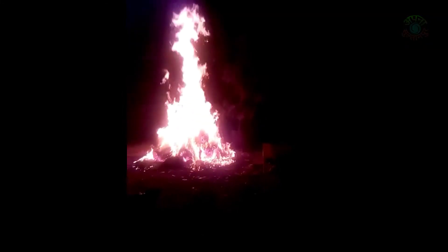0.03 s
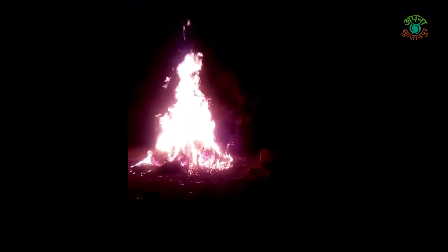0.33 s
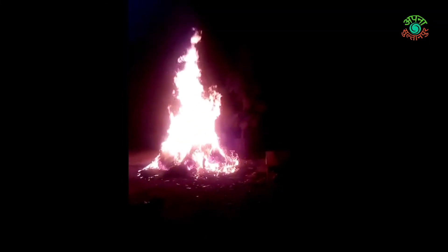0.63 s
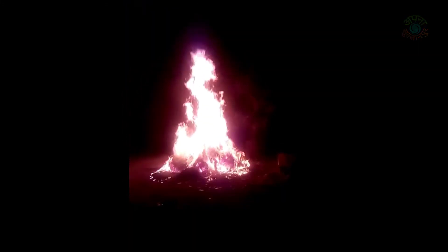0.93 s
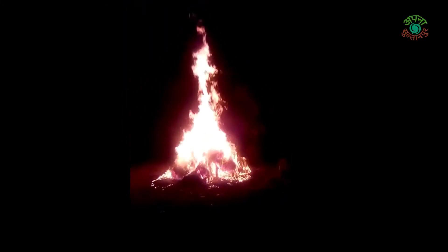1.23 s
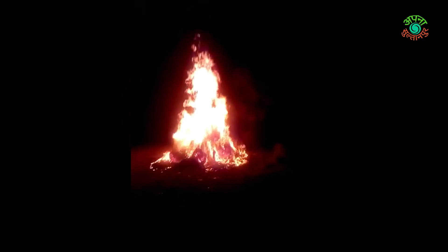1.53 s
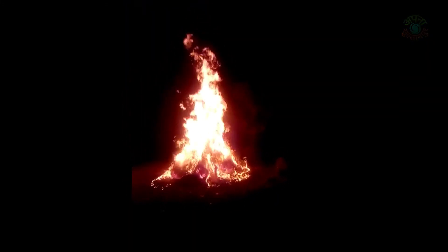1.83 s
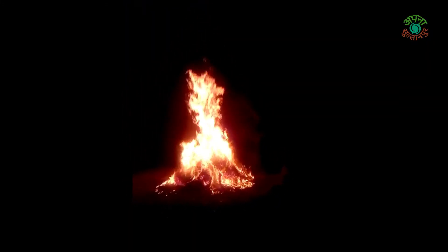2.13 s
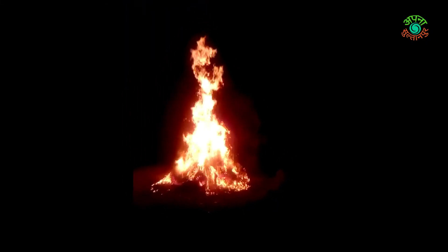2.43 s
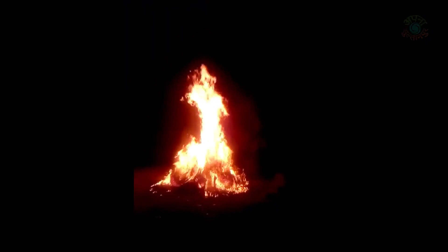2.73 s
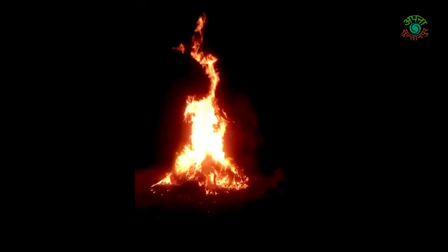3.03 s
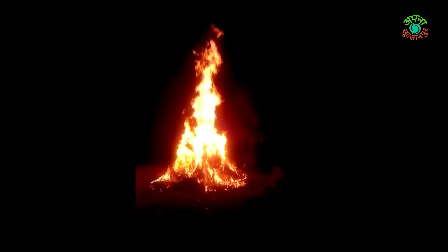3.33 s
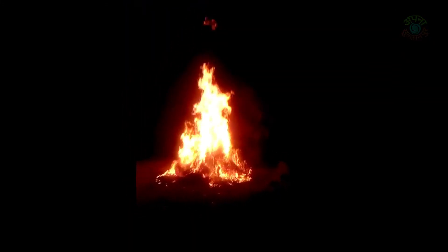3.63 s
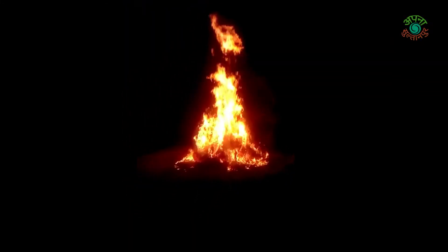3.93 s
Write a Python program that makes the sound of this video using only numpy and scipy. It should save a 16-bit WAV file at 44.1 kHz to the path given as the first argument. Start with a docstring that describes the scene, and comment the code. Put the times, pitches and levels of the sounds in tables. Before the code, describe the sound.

Low roar and rumble of a big outdoor fire, surging under a fine sizzle.

```python
"""A large bonfire burns outdoors at night, over a faint mains hum and a murmur of air. From the start,
dense puffs of burning gas radiate a low roar and a deep rumble, with the rush of eddies and a fine
sizzle above. Leaping flames whoomph twice in the first half second, where the rush is strongest.
The fire surges again near 1.4 s and 2.3 s; after that the whoomphs are weaker and the rumble sinks."""
import sys
import numpy as np
from scipy import signal
from scipy.fft import rfft, irfft
from scipy.io import wavfile
from scipy.ndimage import uniform_filter1d

SR = 44100
rng = np.random.default_rng(int(sys.argv[2]) if len(sys.argv) > 2 else 0)


def generate_wav(sig):
    """Save sig (samples, or channels by samples) to the path in sys.argv[1] as 16-bit PCM at SR."""
    pcm = np.round(np.clip(np.atleast_2d(sig).T, -1, 1) * 32767).astype(np.int16)
    wavfile.write(sys.argv[1], SR, pcm)


N = 176400

# spectral shape of each layer: frequency_hz, relative_db
AIR_SPECTRUM = [(10, -7.5), (30, -1.5), (60, -5.5), (200, -24), (2000, -69)]
SIZZLE_SPECTRUM = [(900, -16.5), (2200, 4), (2700, 2), (3400, 2.5), (4700, -0.6), (5200, -3), (5850, -5),
                   (6300, -15), (6900, -23.5), (7600, -37), (8100, -43.5), (9000, -42), (10000, -59.5)]
RUSH_SPECTRUM = [(60, -42.5), (180, -18), (340, -2.5), (380, 0), (420, 6), (470, -2), (535, -4),
                 (590, -1.5), (660, 2.5), (770, -1.5), (815, -4), (850, -5), (885, -3), (1210, -3),
                 (1310, -7), (1480, -5.5), (2000, -9), (2800, -25.5), (6000, -54.5), (9000, -81)]
RUMBLE_SPECTRUM = [(25, -34.5), (58, -26), (70, -19), (82, -7.5), (91, 6.5), (108, -2), (121, 0.5),
                   (140, -12), (300, -80.5), (900, -100)]
ROAR_SPECTRUM = [(80, -62), (112, -11.5), (134, -7), (155, 3), (170, -5), (184, 1.5), (198, -3), (216, 4.5),
                 (246, 0.5), (284, -6.5), (314, -1), (345, -19.5), (600, -61), (3000, -97)]
# narrow background resonances: pitch_hz, width_hz, level_db
HOLLOW_TONES = [(472.7, 6, -62.5), (934, 19, -79), (1014, 5.1, -80), (1219, 14, -75.5)]
# lines of the mains hum: harmonic_number, level_db
HUM_HARMONICS = [(3, -68), (6, -65), (7, -71.5), (9, -65.5), (10, -63.6), (14, -69.5), (15, -72.5),
                 (16, -77), (20, -81), (22, -72), (23, -76.5), (24, -77.5), (28, -82), (29, -80), (33, -82)]
# envelopes of the rush and the sizzle, before their trims: time_s, rush_db, sizzle_db
RUSH_SIZZLE_ENVELOPES = [(0.0, -58, -60.5), (0.06, -48, -56), (0.34, -48, -54.5), (0.54, -53.5, -58.5),
                         (0.68, -52, -58.5), (0.74, -55.5, -61.5), (0.98, -61.5, -65.5),
                         (1.07, -55.5, -62.5), (1.25, -59.5, -64.5), (1.45, -54.5, -61.5),
                         (1.8, -59, -64.5), (1.94, -59.5, -62), (2.2, -55, -61.5), (2.55, -56.5, -61.5),
                         (2.92, -57, -61.5), (3.16, -62.5, -65.5), (3.48, -58, -63), (4.0, -62, -64.5)]
# envelopes of the rumble and the roar, before their trims: time_s, level_db
RUMBLE_ENVELOPE = [(0.0, -63), (0.06, -56), (0.4, -52.5), (0.54, -60), (0.63, -56), (0.92, -63.5),
                   (1.07, -57), (1.2, -65), (1.36, -53.5), (1.58, -55), (1.64, -53.5), (2.05, -54.5),
                   (2.42, -57.5), (2.52, -65), (2.8, -61), (2.89, -74), (3.1, -67), (3.4, -82), (3.6, -73),
                   (3.8, -64.5), (3.93, -78)]
ROAR_ENVELOPE = [(0.0, -51.5), (0.04, -47), (0.42, -50), (0.5, -51), (0.72, -51), (0.82, -54), (0.98, -53),
                 (1.08, -48.5), (1.26, -53), (1.4, -48.5), (1.63, -50.5), (1.7, -52), (1.93, -52.5),
                 (2.15, -55), (2.42, -50.5), (2.67, -58), (2.8, -53.5), (3.02, -52.5), (3.12, -56),
                 (3.45, -55), (3.7, -54.5), (3.8, -59), (3.87, -56)]
# Gaussian swells of leaping flames: peak_s, sigma_s, pitch_hz, level_db
FLAME_LEAPS = [(0.116, 0.052, 220, -48.5), (0.11, 0.077, 87, -53.5), (0.342, .08, 227, -47.5),
               (0.329, .09, 90, -53.5), (0.74, .035, 225, -51.5), (1.43, .075, 219, -50.5),
               (1.44, 0.08, 94.3, -50.5), (1.576, 0.081, 187, -52), (2.208, 0.07, 223.5, -52),
               (2.25, 0.14, 152.6, -54), (2.353, 0.062, 239, -50.5), (2.843, 0.12, 198, -54.5),
               (3.42, 0.097, 221, -55)]

RUMBLE_TRIM_DB, ROAR_TRIM_DB, RUSH_TRIM_DB, SIZZLE_TRIM_DB = -6, -0.22, -0.38, -1.56
PUFFS_PER_S, EDDIES_PER_S, CRACKLES_PER_S = 1500, 12000, 20000
PULSE_SCATTER_DB, BAND_OCTAVES = 1, 0.55
WHOOMPH_Q = 9.6  # pitch over width
MAINS_HZ, LOW_HUM_TRIM_DB = 50, -8
AIR_DB, HISS_DB = -86.5, -100.5
CUTOFF_HZ, DC_OFFSET = 15800, .0013


def undb(db):
    """Amplitude grows tenfold for every 20 dB."""
    return 10 ** (np.asarray(db) / 20)


def unit(x):
    """Normalisation to a standard deviation of 1."""
    return x / np.std(x)


def envelopes(table):
    """Linear interpolation in time gives one curve per level column."""
    times, *columns = np.array(table).T
    return [np.interp(np.arange(N) / SR, times, column) for column in columns]


def colour(x, spectrum):
    """Minimum-phase filtering: folding the cepstrum gives a causal filter of the given spectrum."""
    hz, db = np.array(spectrum, float).T
    bin_hz = np.maximum(np.arange(N // 2 + 1) * SR / N, 1)
    gain = undb(np.interp(np.log(bin_hz), np.log(hz), db))
    cepstrum = irfft(np.log(gain), N)
    cepstrum[1:N // 2] *= 2
    cepstrum[N // 2 + 1:] = 0
    return irfft(rfft(x) * np.exp(rfft(cepstrum)), N)


def shot_noise(per_s, scatter_db):
    """One-sided pressure pulses arrive independently at random; their mean is removed."""
    pulses = (rng.random(N) < per_s / SR) * undb(scatter_db * rng.standard_normal(N))
    return unit(pulses.mean() - pulses)


def steady(x, span_s, share):
    """Compression by the running power takes a share of the chance swells out of a noise."""
    window = int(span_s * SR) + 1
    power = uniform_filter1d(uniform_filter1d(x ** 2, window), window)
    return unit(x / power ** (np.clip(share, 0, 1) / 2))


def steady_bands(x, span_s, share):
    """Band-wise compression: as when many flames burn at once, no band swells or drops out for long."""
    octave = np.log2(np.maximum(np.arange(N // 2 + 1) * SR / N, 1))
    centres = np.arange(np.log2(64), np.log2(8192), BAND_OCTAVES)
    spectrum = rfft(x)
    bands = (irfft(spectrum * np.interp(octave, centres, weight), N) for weight in np.eye(len(centres)))
    return unit(sum(np.std(band) * steady(band, span_s, share) for band in bands))


def ring(hz, width_hz):
    """Resonance selects a narrow band of turbulence: a wavering tone of even strength, rms 1."""
    b, a = signal.iirpeak(hz, hz / (2 * width_hz), fs=SR)
    once = signal.lfilter(b, a, rng.standard_normal(N))
    twice = signal.lfilter(b, a, once)
    return steady(twice, span_s=.025, share=.95)


def night_air():
    """Stationary noise weighted to low frequencies is heard as a deep murmur."""
    return undb(AIR_DB) * unit(colour(rng.standard_normal(N), AIR_SPECTRUM))


def hollow_tones():
    """Narrow resonances driven by noise waver faintly behind the fire."""
    return sum(undb(db) * ring(hz, width_hz) for hz, width_hz, db in HOLLOW_TONES)


def mains_harmonic(number):
    """A harmonic is a sinusoid at a whole multiple of the fundamental; random phase, rms 1."""
    return np.sqrt(2) * np.sin(2 * np.pi * (number * MAINS_HZ * np.arange(N) / SR + rng.random()))


def mains_hum(rumble_db):
    """A periodic buzz has a line spectrum; the lowest line follows the rumble, the rest are steady."""
    buzz = sum(undb(db) * mains_harmonic(round(number)) for number, db in HUM_HARMONICS)
    return buzz + undb(rumble_db + LOW_HUM_TRIM_DB) * mains_harmonic(2)


def sizzle(level_db):
    """By superposition, countless tiny crackles merge into a hiss."""
    crackles = colour(shot_noise(CRACKLES_PER_S, scatter_db=0), SIZZLE_SPECTRUM)
    return steady(crackles, span_s=0.0026, share=0.65) * undb(level_db + SIZZLE_TRIM_DB)


def rush(level_db):
    """Turbulence: small eddies in the rising gas radiate broadband noise."""
    eddies = colour(shot_noise(EDDIES_PER_S, PULSE_SCATTER_DB), RUSH_SPECTRUM)
    return steady_bands(eddies, span_s=.015, share=.75) * undb(level_db + RUSH_TRIM_DB)


def whoomphs():
    """Amplitude modulation of narrowband noise: each leaping flame swells and fades at its own pitch."""
    t = np.arange(N) / SR
    sound = np.zeros(N)
    for peak_s, sigma_s, hz, db in FLAME_LEAPS:
        swell = np.exp(-((t - peak_s) / sigma_s) ** 2 / 2)
        sound += undb(db) * swell * ring(hz, hz / WHOOMPH_Q)
    return sound


def flames(rumble_db, roar_db):
    """Combustion noise: the same puffs of burning gas drive the deep rumble and the roar."""
    puffs = shot_noise(PUFFS_PER_S, PULSE_SCATTER_DB)
    rumble = steady(colour(puffs, RUMBLE_SPECTRUM), span_s=.04, share=.9)
    roar = steady_bands(colour(puffs, ROAR_SPECTRUM), span_s=.03, share=.85)
    return rumble * undb(rumble_db + RUMBLE_TRIM_DB) + roar * undb(roar_db + ROAR_TRIM_DB)


def scene():
    """The pressures of fire, hum, hollow tones and night air add linearly at one point."""
    [rumble_db] = envelopes(RUMBLE_ENVELOPE)
    [roar_db] = envelopes(ROAR_ENVELOPE)
    rush_db, sizzle_db = envelopes(RUSH_SIZZLE_ENVELOPES)
    fire = flames(rumble_db, roar_db) + whoomphs() + rush(rush_db) + sizzle(sizzle_db)
    return (fire + mains_hum(rumble_db) + hollow_tones() + night_air())[None]


def record(dry):
    """Band limiting: the sound and a trace of hiss are low-passed, then shifted slightly off zero."""
    hiss = undb(HISS_DB) * rng.standard_normal(N)
    low_pass = signal.ellip(8, .2, 70, CUTOFF_HZ, fs=SR, output="sos")
    return signal.sosfilt(low_pass, dry + hiss) + DC_OFFSET


dry = scene()
out = record(dry)
generate_wav(out)
```